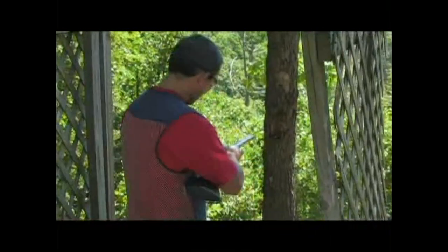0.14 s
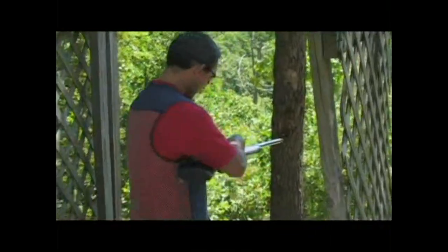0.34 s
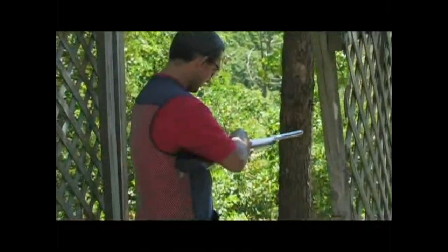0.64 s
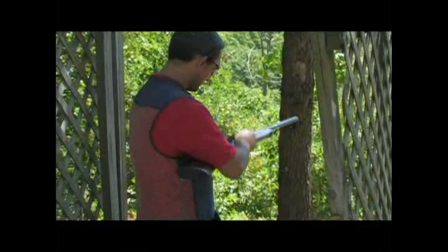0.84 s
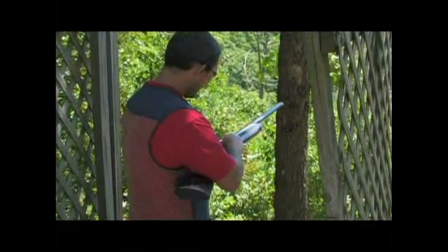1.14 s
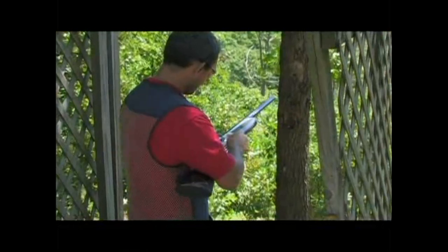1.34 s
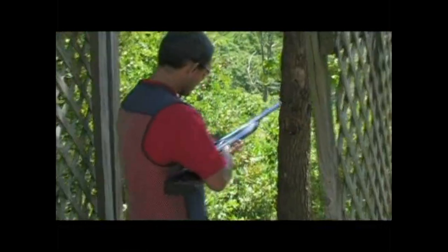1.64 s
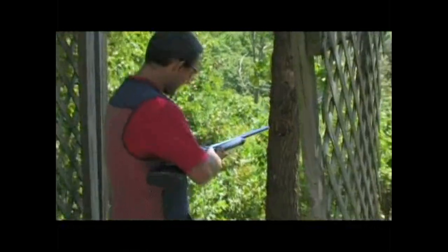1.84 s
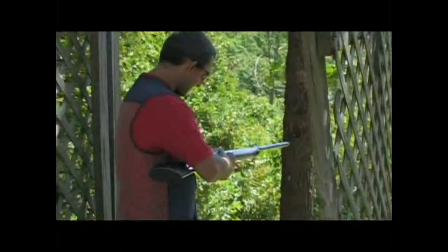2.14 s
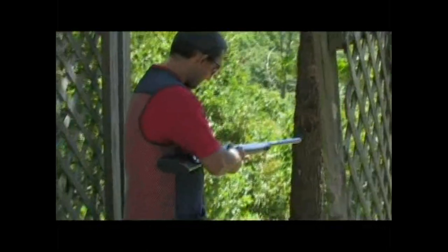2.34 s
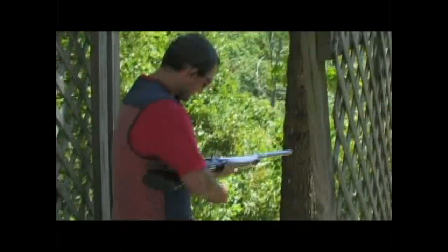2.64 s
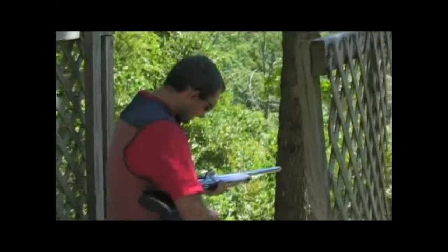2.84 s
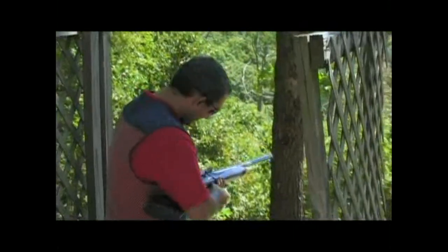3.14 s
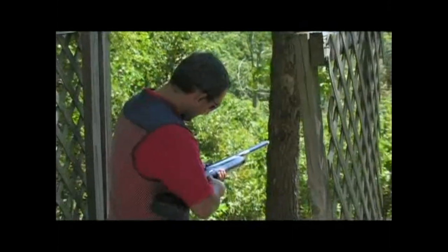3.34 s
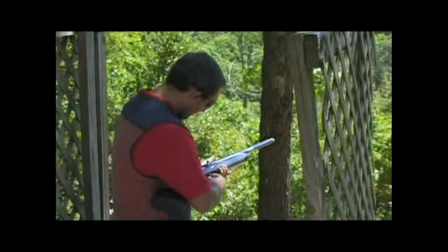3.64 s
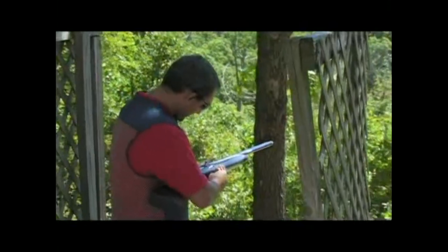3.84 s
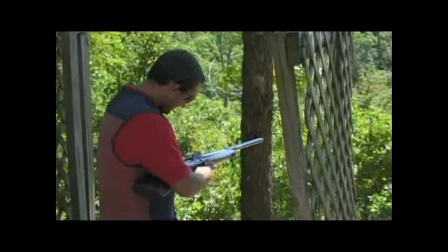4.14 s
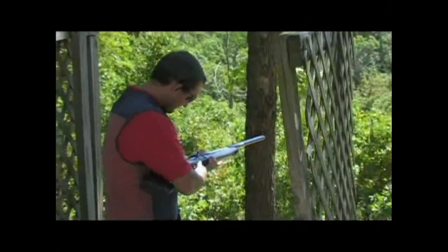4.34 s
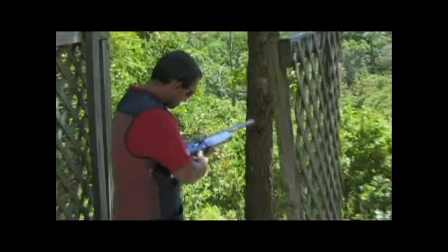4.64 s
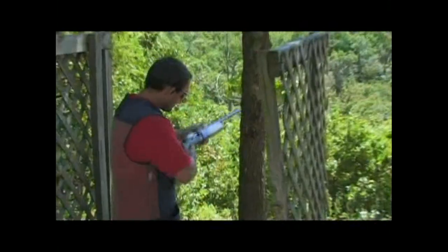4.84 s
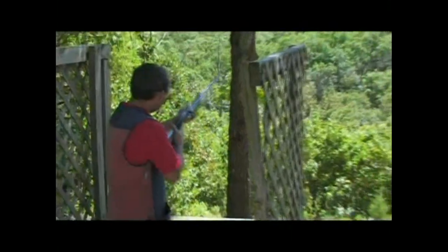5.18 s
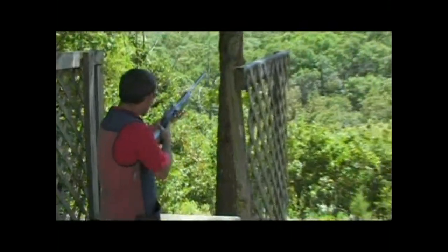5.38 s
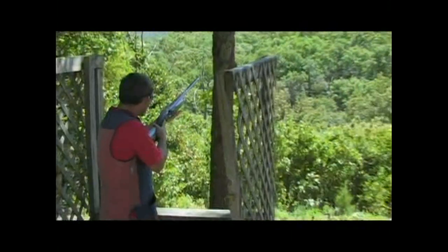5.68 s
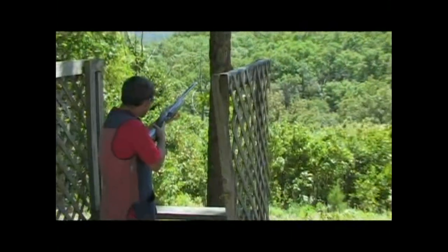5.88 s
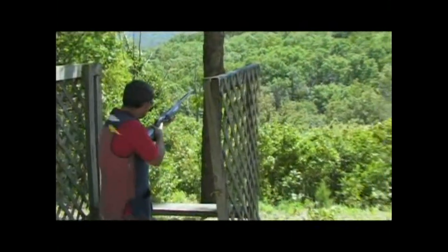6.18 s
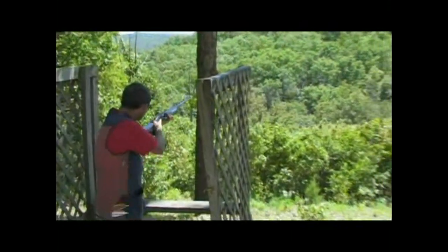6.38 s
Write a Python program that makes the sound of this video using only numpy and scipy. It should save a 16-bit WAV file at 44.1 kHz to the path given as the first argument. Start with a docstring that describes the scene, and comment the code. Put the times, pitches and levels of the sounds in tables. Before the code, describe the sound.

Faint steady leaf hush and lumpy low wind rumble lie under everything. Tiny ticks lead to a crisp click at 0.35 s, a soft scrape near 0.5-0.6, and another click at 0.8. At 1.35 a short rising scrape ends in a snap, followed by small clicks and a brief brass chink at 1.52. Soft taps continue from 1.9 to 2.3. At 2.54-2.63 the action slams in a dense, very loud run of steel clacks with a dull thump, clipped at its peak, leaving a short barrel ring and airy echoes. Low bumps follow around 3.0-3.2. A sharp click at 3.52 starts more fiddly ticks; a squeaky slide from 4.03 ends in a hard snap at 4.12. Light clicks sound near 4.3. At 4.63-4.65 a bright double clack with a low thud closes the action. Then only breeze and leaves, with barely audible ticks at 5.15, 5.8 and 6.2, until 6.5.

```python
"""Clicks, clacks and ringing slams: shells are thumbed into a shotgun and its action is racked shut,
in a wooden stand at the edge of a wood. Each contact of brass, plastic and steel is a short burst of
noise shaped by the receiver; sliding parts scrape, dull bumps are low swings, barrel and brass ring as sines.
The gun's sharp sounds return as faint echoes off lattice and leaves. Light wind rumbles on the microphone
over the hush of leaves, both made of coloured noise."""
import sys
import numpy as np
from scipy import signal
from scipy.fft import rfft, irfft
from scipy.io import wavfile
from scipy.ndimage import uniform_filter1d

SR = 44100
rng = np.random.default_rng(int(sys.argv[2]) if len(sys.argv) > 2 else 0)


def file_out(sig):
    """Save sig as 16-bit WAV at sys.argv[1]."""
    # one column per channel
    cols = np.atleast_2d(sig).T
    # limit, then scale
    lim = np.clip(cols, -1, 1)
    pcm = np.round(lim * 32767).astype(np.int16)
    wavfile.write(sys.argv[1], SR, pcm)


N = 287242


def gain_of(db):
    """Turns decibels into a plain multiplier."""
    return 10 ** (np.asarray(db) / 20)


def evened(x):
    """Scales a sound to an average (RMS) level of 1."""
    return x / np.sqrt(np.mean(x ** 2) + 1e-20)


def add(mix, start_s, sound):
    """Mixes a sound in at its start time, cutting it off where the scene ends."""
    part = mix[round(start_s * SR):][:len(sound)]
    part += sound[:len(part)]


def curve(rows):
    """Reads a table of (time [s], value) at every sample, with straight lines between its rows."""
    return np.interp(np.arange(N) / SR, *np.transpose(rows))


def band(x, low_hz, high_hz):
    """Keeps mainly the sound between two frequencies."""
    return signal.sosfilt(signal.butter(2, [low_hz, high_hz], "bandpass", fs=SR, output="sos"), x)


def resonate(x, hz, width_hz):
    """A two-pole resonance with a gain of 1 at its top."""
    return signal.lfilter(*signal.iirpeak(hz, hz / width_hz, SR), x)


def coloured(points):
    """Steady noise whose spectrum follows a table of (frequency [Hz], relative level [dB per Hz])."""
    point_hz, point_db = np.transpose(points)
    hz = np.fft.rfftfreq(N, 1 / SR)
    level_db = np.interp(np.log(hz + 1), np.log(point_hz), point_db)
    return irfft(rfft(rng.standard_normal(N)) * gain_of(level_db), N)


def rattle(count, uneven_db):
    """Tiny impacts of uneven size: noise whose strength jumps every 24 samples (about half a millisecond)."""
    sizes = np.repeat(rng.standard_normal(count // 24 + 1), 24)[:count]
    return rng.standard_normal(count) * gain_of(uneven_db * sizes)


def receiver(x, ring_hz, ring_db, width_hz):
    """Metal body: adds short resonances, with a random favour each time, and one chosen ring."""
    # short resonances of receiver and shell: (frequency [Hz], width [Hz], level before the favour [dB])
    resonances = [(800, 67, 2.5), (980, 210, 4.5), (1315, 460, 7.5), (2465, 140, 5.5), (3130, 340, -1),
                  (3600, 250, -1), (4414, 770, 7), (7270, 360, 4), (8100, 330, 5), (9700, 800, -3),
                  (12815, 250, -13)]
    favour_db = 2.0 * rng.standard_normal(len(resonances))
    body = x.copy()
    for (hz, width, db), favour in zip(resonances, favour_db):
        body += gain_of(db + favour) * resonate(x, hz, width)
    return evened(body + gain_of(ring_db) * resonate(x, ring_hz, width_hz))


def ring(modes, strikes):
    """Each strike sets all the modes ringing as fading sines; loose parts make every ring waver."""
    out, t = np.zeros(N), np.arange(SR // 2) / SR
    for start_s, strike_db in strikes:
        for hz, mode_db, t60 in modes:  # t60: time to fade by 60 dB
            waver = evened(uniform_filter1d(rng.standard_normal(len(t)), round(SR * t60 / 20)))
            level_db = strike_db + mode_db - 60 * t / t60 + 2.5 * waver
            tone = np.sin(2 * np.pi * (hz * t + rng.random()))  # random starting phase
            add(out, start_s, gain_of(level_db) * tone)
    return out


def outdoors():
    """Leaves hush almost steadily as broad noise; wind is low noise that comes in lumps."""
    # spectrum of the leaves: (frequency [Hz], relative level [dB per Hz])
    leaf_spectrum = [(12, -57), (20, -28.5), (56, -10), (113, -5), (307, -15), (395, -15), (480, -13.5),
                     (887, -15), (1310, -19), (1830, -23.5), (3200, -29.5), (12500, -41), (15700, -49)]
    # slow swell of the leaves: (time [s], change of level [dB])
    leaf_swell = [(0.0, 0), (6.51, 0.5)]
    # spectrum of the wind: (frequency [Hz], relative level [dB per Hz])
    wind_spectrum = [(15, -31), (35, -13), (70, -1), (120, -3.5), (200, -15), (400, -21), (1000, -58.5)]
    # wind rumble on the microphone: (time [s], level [dB])
    wind_level = [(0.0, -57.5), (0.47, -47), (0.6, -43.5), (1.52, -43.5), (1.83, -50.5), (1.99, -47),
                  (2.23, -43.5), (3.03, -41), (3.26, -49.5), (3.81, -54), (4.0, -48), (4.37, -51.5),
                  (5.28, -45), (6.13, -51.5), (6.51, -48)]
    leaves_db = -50.5  # level before the swell
    leaves = coloured(leaf_spectrum)
    leaves = evened(leaves - band(leaves, 18.5, 270))  # thin out the lows
    lumps = uniform_filter1d(rng.standard_normal(N), 1300)  # random drift, smoothed twice over 29 ms
    lumps = evened(uniform_filter1d(lumps, 1300))
    wind = evened(coloured(wind_spectrum) * gain_of(3.8 * lumps))
    return leaves * gain_of(leaves_db + curve(leaf_swell)) + wind * gain_of(curve(wind_level))


def stand(x):
    """Scattered echoes: a quick one from the lattice, a longer airy one from the leaves."""
    t = np.arange(SR // 2) / SR
    signs = rng.choice([-1., 1.], len(t))
    taps = signs * (rng.random(len(t)) < .3) * (t > .004)  # no echo in the first 4 ms
    # each echo fades by 60 dB in the time it is divided by [s]
    lattice = band(taps, 600, 9800) * gain_of(-54 - 60 * t / 0.045)
    leaves = band(taps, 3000, 16000) * gain_of(-51.5 - 60 * t / .36)
    return signal.oaconvolve(x, lattice + leaves)[:N]


def bumps():
    """Dull bumps of stock and hands: each is a heavily damped low swing."""
    # (time [s], level before damping [dB], frequency [Hz], swings until the level has fallen to about a third)
    bump_rows = [(0.52, -26, 122, 2.1), (1.46, -31.5, 194, 0.8), (2.548, -15, 243, 0.25),
                 (2.612, -10.5, 248.4, 1.22), (3.01, -22.5, 156, 0.69), (3.032, -28.5, 160, 2.6),
                 (3.228, -31, 203, 1.36), (3.837, -19, 280, 0.42), (3.8464, -19.5, 240, 0.49),
                 (3.851, -26.5, 116, 1.7), (4.124, -37.5, 259, 4.5), (4.65, -7, 217.6, 0.81)]
    out, t = np.zeros(N), np.arange(6000) / SR
    for start_s, db, hz, swings in bump_rows:
        swing = np.sin(2 * np.pi * hz * t) * np.exp(-hz * t / swings)
        add(out, start_s, -gain_of(db) * swing)
    return out


def slides():
    """Sliding shells and slide: stick-slip scraping through the same receiver, with a thin squeak."""
    # (start [s], end [s], level at the start [dB], level at the end [dB],
    #  treble against the middle [dB], squeak frequency [Hz], squeak against the middle [dB])
    slide_rows = [(0.488, 0.56, -53, -60, -24, 3410, -9), (0.548, 0.625, -48.5, -50, -26, 2394, -9),
                  (1.338, 1.381, -54.5, -28, -14, 7800, -9), (1.343, 1.384, -46.5, -40.5, -23, 2395, -4),
                  (2.586, 2.597, -26, -24.5, -2.5, 935, -9), (3.758, 3.782, -55, -42, -15, 2770, -3),
                  (3.929, 4.025, -59, -58.5, -21.5, 2720, -3), (4.032, 4.125, -47.5, -53, -14, 2550, -1),
                  (4.05, 4.118, -59, -56, -9, 1344, 9)]
    out = np.zeros(N)
    for start, end, start_db, end_db, treble_db, hz, squeak_db in slide_rows:
        count = round((end - start) * SR)
        noise = receiver(rattle(count, uneven_db=2.5), hz, ring_db=-7.0, width_hz=300)
        # filtering twice makes the edges steeper
        middle = evened(band(band(noise, 900, 3400), 900, 3400))
        treble = evened(band(band(noise, 6000, 11500), 6000, 11500))
        squeak = evened(resonate(resonate(noise, hz, .035 * hz), hz, .035 * hz))
        scrape = middle + gain_of(treble_db) * treble + gain_of(squeak_db) * squeak
        level = gain_of(np.linspace(start_db, end_db, count))
        add(out, start, scrape * level * signal.windows.tukey(count, .3))  # soft start and end
    return out


def brass_chinks():
    """Shells touching steel: the brass heads ring very briefly."""
    # ring of a brass head: (frequency [Hz], level against the strike [dB], time to fade by 60 dB [s])
    brass_modes = [(3150, 5, 0.028), (6200, 1, 0.049), (7400, -5, .045), (9850, -1, 0.036),
                   (12800, 4, 0.027), (13300, 1, 0.039)]
    # touches: (time [s], level [dB])
    touches = [(1.524, -37.5), (1.544, -61), (1.589, -52.5), (4.076, -54)]
    return ring(brass_modes, touches)


def barrel_ring():
    """Two slams of the action leave the barrel ringing for longer."""
    # ring of the barrel: (frequency [Hz], level against the strike [dB], time to fade by 60 dB [s])
    barrel_modes = [(495, 9, .24), (1335, 7, .17), (1664, 0, .62), (2557, -11, .18), (4463, -15, .35),
                    (6745, -13, .19), (9415, -13, .2), (11540, -13, .19)]
    # blows that set it ringing: (time [s], level [dB])
    slams = [(2.624, -38), (4.652, -52)]
    return ring(barrel_modes, slams)


def contacts():
    """Each contact is a quick rattle: light taps die at once, hard blows chatter in a hump; a weak after-rattle."""
    # (time [s], basic length [s], basic level [dB], brightness [dB per octave], strongest ring [Hz]); the faint
    # bright tick at 2.667 s is no contact but the slam coming back as an echo
    contact_rows = [(0.135, 0.0046, -63.5, -2, 1800), (0.214, 0.0024, -60.5, -12, 1440),
                    (0.308, .003, -58, -3, 1980), (0.353, 0.004, -32.5, -4, 1020),
                    (0.361, 0.0028, -39, 0.5, 7900), (0.378, 0.0013, -61, 2, 8000),
                    (0.7855, 0.0047, -33, -1, 2540), (0.826, .016, -51, -7, 990),
                    (0.905, 0.0065, -48, -5, 780), (1.3797, 0.0028, -31, -2, 8300),
                    (1.417, 0.0033, -53, -8, 3280), (1.462, 0.0035, -42, -6, 624),
                    (1.49, .002, -53, -7, 900), (1.5067, 0.0029, -46, -3, 2300),
                    (1.522, 0.0051, -30.5, -2.5, 1060), (1.545, 0.0037, -46, -4, 1070),
                    (1.564, 0.0098, -47.5, -3, 730), (1.58, .002, -54, -7, 3000),
                    (1.588, 0.0057, -50, -9, 2840), (1.862, 0.0031, -42, -5.5, 2570),
                    (1.8855, 0.0058, -48.5, -6, 1490), (1.9646, 0.00074, -62.5, 5, 10000),
                    (2.106, 0.0056, -49.5, -5, 1330), (2.2007, 0.015, -50, -4.5, 3330),
                    (2.339, 0.0055, -55.5, -11.5, 1050), (2.5387, 0.0042, -18, -1.5, 2830),
                    (2.5447, 0.0025, -21, -2.5, 880), (2.549, 0.0051, -15.5, -1.6, 2080),
                    (2.558, 0.0053, -13.5, -1.5, 2960), (2.563, 0.0066, -21, -4.5, 1740),
                    (2.5697, 0.005, -13.5, -1.2, 6900), (2.5785, 0.0061, -9.5, -1, 820),
                    (2.599, 0.0092, -12, -2, 765), (2.611, 0.0097, -7.5, -.6, 8150),
                    (2.6151, .006, -9, -3, 2154), (2.6225, 0.0046, -8, -2, 1750),
                    (2.667, .003, -43, -0.3, 10230), (3.271, 0.0016, -69, 2.5, 10800),
                    (3.3585, 0.0043, -52, -8, 650), (3.379, 0.002, -43, -2.5, 760),
                    (3.425, .0031, -52.5, -4, 1300), (3.5172, 0.004, -21.5, -2.5, 910),
                    (3.545, 0.0018, -52.5, -8, 2450), (3.562, 0.0009, -38, -4, 3300),
                    (3.5667, 0.0025, -37.5, -1.5, 870), (3.591, 0.0013, -48, -5, 1700),
                    (3.679, 0.0009, -44, -8, 2060), (3.702, .001, -46, -3, 2420),
                    (3.746, 0.00073, -42.5, -5.5, 3040), (3.774, .0056, -51, -4, 870),
                    (3.835, .0014, -55, -4, 816), (3.845, .0011, -49.5, -3.5, 740),
                    (3.894, 0.0044, -50, -6, 840), (3.91, .0032, -54.5, -2.5, 3100),
                    (4.0196, 0.0039, -46.5, -5, 1540), (4.076, 0.0029, -37, -2, 2740),
                    (4.09, 0.0036, -40.5, -3, 1380), (4.0982, 0.00092, -42, 0.5, 9400),
                    (4.112, 0.0054, -39, -2.5, 3000), (4.1221, 0.0037, -13.5, -1.7, 3100),
                    (4.13, 0.0024, -31.5, -2, 2940), (4.272, .003, -47, -3, 3200),
                    (4.2826, 0.00084, -41.5, -2.5, 1450), (4.306, 0.003, -45.5, -0.5, 604),
                    (4.6287, 0.0047, -15.5, -1.5, 2500), (4.6412, 0.0032, -30, -2, 2800),
                    (4.6463, 0.0064, -6, -1.94, 6930), (4.651, 0.0067, -14, 0.1, 3520),
                    (5.145, .0015, -70.5, 4, 12800), (5.832, .002, -57.5, -3.5, 1600),
                    (6.1904, 0.0036, -55, -9, 2000)]
    # four parts, knock to tick: (low edge [Hz], high edge [Hz], length as a factor [-], change of level [dB])
    part_rows = [(330, 1414, 1.49, -0.5), (1150, 3390, 1.34, 3.5), (3600, 6670, 0.71, 1.2),
                 (8300, 14000, 1.2, 0.8)]
    light_db, hard_span_db = -31, 2  # from this level up, a tap turns into a hard blow over this span
    favour_light_db, favour_hard_db, favour_octaves = 7, 2.5, 0.42  # lift of parts near the strongest ring
    pivot_hz = 1900  # brightness tilts the parts about this pitch
    dull_light_db = 0.14  # light taps lose their far ends: dB per octave squared away from the ring
    strike, strike_s = 1.1, 0.00095  # extra strength and fading time of a light tap's sharp start
    out, t = np.zeros(N), np.arange(3000) / SR
    for start_s, length, level_db, bright_db, hz in contact_rows:
        hard = np.clip((level_db - light_db) / hard_span_db, 0, 1)  # 0 = light tap, 1 = hard blow
        favour_db = favour_light_db + (favour_hard_db - favour_light_db) * hard
        width_hz = (150 + .05 * hz) * (1 + 0.96 * hard)
        noise = receiver(rattle(len(t), uneven_db=3.5), hz, ring_db=19.5 - 9.5 * hard, width_hz=width_hz)
        for low_hz, high_hz, longer, part_db in part_rows:
            mid_hz = np.sqrt(low_hz * high_hz)
            octaves_off = np.log2(mid_hz / hz)
            near = np.exp(-(octaves_off / favour_octaves) ** 2)
            db = level_db + part_db + bright_db * np.log2(mid_hz / pivot_hz) + favour_db * near
            db -= dull_light_db * (1 - hard) * octaves_off ** 2
            u = t / (max(length, .001) * longer)  # time counted in lengths of this part
            rise = 1 - np.exp(-u / (0.033 + 0.27 * hard ** 2))
            after_rattle = gain_of(-21.0) * np.exp(-u / 1.6)
            shape = rise * (np.exp(-u ** (1 + 1.2 * hard)) + after_rattle)
            shape = shape * (1 + strike * (1 - hard) * np.exp(-t / strike_s))
            # the part keeps the average level of its shape
            part = evened(band(noise, low_hz, high_hz) * shape) * np.sqrt(np.mean(shape ** 2))
            add(out, start_s, gain_of(db) * part)
    return out


def scene():
    """Adds up the gun, its echoes, the dull bumps and the outdoors, as one channel."""
    gun = slides() + brass_chinks() + barrel_ring() + contacts()
    return (outdoors() + stand(gun) + bumps() + gun)[None]


def record(dry):
    """The hardest blows overload the input and are cut flat; then a filter removes the highest treble."""
    clipped = np.clip(dry, -.95, .95)
    low_pass = signal.firwin(255, 15700, window=("kaiser", 7), fs=SR)  # edge in Hz
    return signal.oaconvolve(clipped, low_pass[None], "same")


dry = scene()
out = record(dry)
file_out(out)
```